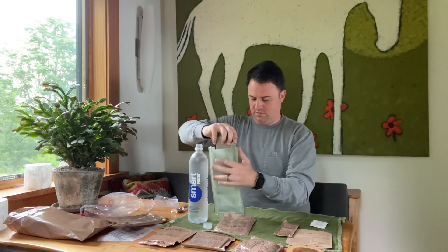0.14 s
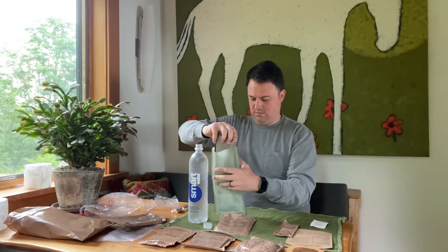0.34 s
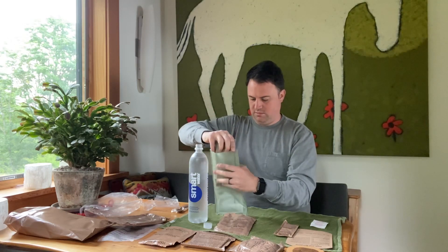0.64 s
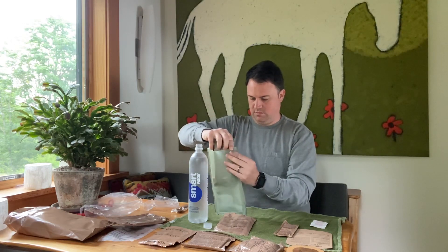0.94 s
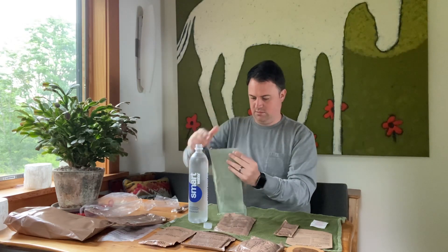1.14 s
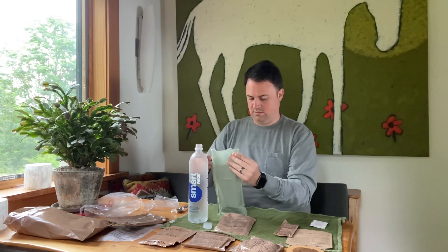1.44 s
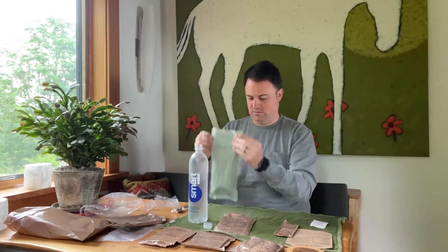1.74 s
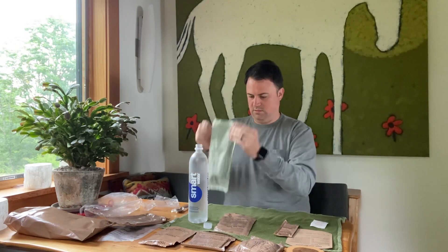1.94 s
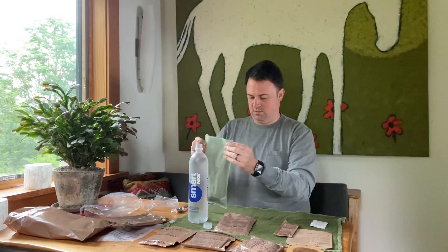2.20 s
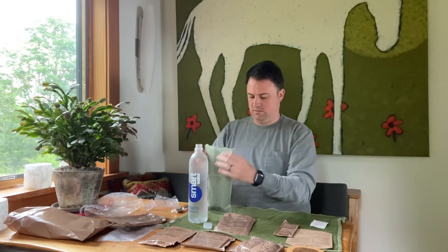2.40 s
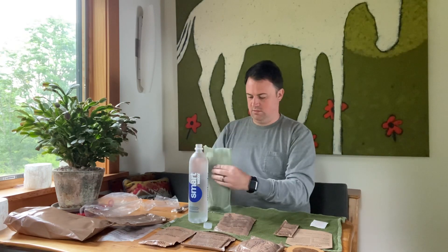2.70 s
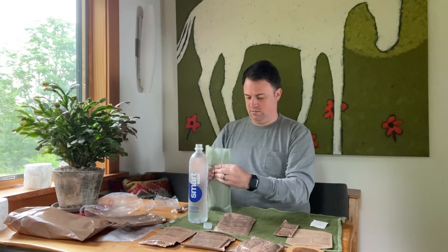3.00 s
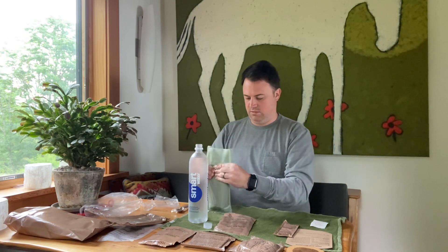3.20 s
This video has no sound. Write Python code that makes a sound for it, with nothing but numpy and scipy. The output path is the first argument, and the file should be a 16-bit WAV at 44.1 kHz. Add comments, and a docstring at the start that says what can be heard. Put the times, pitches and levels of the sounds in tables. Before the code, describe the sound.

A thin plastic sleeve crinkles and crackles sharply in bursts as hands work a pouch inside.

```python
"""At a table in a small, quiet room, a food pouch is worked down into a thin plastic heater sleeve. Creases
snap as sharp filtered clicks over a dense crinkle of random ticks that follows each push of the hands. The
pouch knocks, and the film squeaks and ticks, in short decaying tones; the pouch bumps softly, a low swing with
filtered noise, as the sleeve is lifted and set down. Two microphones hear snaps, crinkle and ringing tones
directly and by reflections made of decaying noise, over faint room tone."""
import sys
import numpy as np
from scipy import signal
from scipy.fft import rfft, irfft
from scipy.io import wavfile

SR = 44100
rng = np.random.default_rng(int(sys.argv[2]) if len(sys.argv) > 2 else 0)


def to_wav(s):
    """Save 16-bit WAV."""
    ch = np.atleast_2d(s).T  # columns
    pcm = np.round(np.clip(ch, -1, 1) * 32767)  # PCM
    wavfile.write(sys.argv[1], SR, pcm.astype(np.int16))


N = 147735
TAPS = 16384  # length of the room responses, samples
HZ = np.fft.rfftfreq(TAPS, 1 / SR)


def amp(db):
    """Decibels to gain."""
    return 10 ** (np.asarray(db) / 20)


def unit(x):
    """Scales to rms 1."""
    return x / np.sqrt(np.mean(x ** 2) + 1e-20)


def read(points, hz):
    """Reads a curve over frequency, straight between its points on a log-frequency axis."""
    f, value = np.transpose(points)
    return np.interp(np.log(hz + 1), np.log(f), value)


def add(mix, start_s, sound):
    """Adds a stereo sound to the mix at its start time."""
    part = mix[:, max(round(start_s * SR), 0):][:, :sound.shape[1]]
    part += sound[:, :part.shape[1]]


def causal(gain):
    """The sharpest impulse response with this spectrum: minimum phase, from the log gain."""
    log_gain = np.log(np.maximum(gain, gain.max() * 1e-5))
    both_sides = np.r_[log_gain, log_gain[-2:0:-1]]
    spectrum = np.exp(np.conj(signal.hilbert(both_sides)))
    return irfft(spectrum[:len(gain)])


def snaps():
    """A crease flips in one sharp click, rings for a few cycles and sets off smaller ones."""
    # Snapping creases. Each row: start in seconds, level in dB before snap_db, body and treble
    # in dB relative to the middle, ring in Hz.
    creases = [(0.0231, -31, -16, -8, 1960), (0.1368, -21, -23, -3.5, 1980), (0.159, -26, -14, -10, 1730),
               (0.208, -27.5, -16, -22, 1090), (0.2278, -24, -19, -2, 1030), (0.29, -24.5, -21, -6, 1430),
               (0.404, -21.5, -2, -2, 3580), (0.4079, -21, -9, -11, 1950), (0.4302, -23.5, -6, -0.5, 1740),
               (0.454, -21.5, -17, -8, 1790), (0.5555, -24.5, -6, -3, 2060),
               (0.5643, -18, -13.5, -15, 3040), (0.612, -24.5, -21, -32, 1760),
               (0.6345, -24, -13, -9, 1900), (0.6672, -21.5, -11, -20, 1840), (0.684, -16.5, -6, 9, 1690),
               (0.735, -27.5, -18, -26, 1730), (0.788, -27.5, -21, -2, 1510), (0.8046, -22, -5, -4, 1930),
               (0.8597, -22.5, -7, -3, 2000), (0.9939, -20, -3, 3, 1700), (1.009, -18.5, 2.5, 0, 1700),
               (1.036, -15.5, -4.5, -3, 1670), (1.0717, -21, -16, -17, 1970), (1.1078, -14, -7, -20, 1910),
               (1.152, -14.5, -8.5, 1.5, 1930), (1.2003, -19, -7.5, -10, 1550),
               (1.2447, -21.5, -6, -26, 1800), (1.285, -31.5, -10, -8, 1930), (1.3014, -17, -9, 1, 2220),
               (1.405, -28.5, -2, -14, 2120), (1.4444, -28.5, -3, -10, 1800), (1.5002, -30, -5, -22, 1350),
               (1.5645, -23, 0, -1, 1860), (1.585, -25.5, -1, -6, 1900), (1.6317, -25.5, -1, -10, 2100),
               (1.832, -45.5, 0, -16, 1830), (1.9095, -16, -5, -3, 1660), (1.9524, -14, -28, -4.5, 4640),
               (2.009, -14.5, -4.5, -9, 2700), (2.024, -21.5, 0, 3, 2260), (2.0792, -24.5, -1, -1, 2100),
               (2.1548, -32, -22, -18, 2100), (2.171, -32.5, -21, -13, 1570),
               (2.241, -28, -2.5, -1.5, 2020), (2.421, -20, 0, 1, 2310), (2.4416, -21, -23, -2, 3360),
               (2.48, -13, -0.5, 2.5, 1730), (2.524, -24, -2, -15, 2240), (2.591, -18, -5, -1.5, 3230),
               (2.6017, -20, -13, 12, 1760), (2.6684, -21.5, -3, -7.5, 2430), (2.844, -37.5, -6, -11, 1990),
               (2.8677, -18, -6, 3, 4440), (2.9615, -16, 5, 10, 5200), (3.033, -25.5, 8, 5, 1400),
               (3.0762, -19, -9, 0, 2120), (3.0905, -22, -8, -19, 2260), (3.1207, -19.5, -17, -10, 1180),
               (3.185, -26.5, -10, 11, 1670), (3.2458, -22.5, -17, -4, 1640)]
    snap_db, direct_db = 4.5, 3  # large facets beam their sound at the microphones
    ring_db, ring_width_oct = 5, .22
    after_db, after_s = -13, .002  # the smaller clicks and their decay time
    out = np.zeros((2, N))
    body, middle, treble = film_bands()
    t = np.arange(TAPS // 16) / SR
    for start_s, db, body_db, treble_db, ring_hz in creases:
        octaves = np.log2((HZ + 1) / ring_hz)
        ring = amp(ring_db * np.exp(-.5 * (octaves / ring_width_oct) ** 2))
        colour = amp(body_db) * body + middle + amp(treble_db) * treble
        click = causal(unit(colour * ring * facet()))
        # cubed noise: a few strong clicks among many weak ones
        smaller = unit(rng.standard_normal(len(t)) ** 3 * np.exp(-t / after_s))
        force = amp(after_db) * smaller / np.sqrt(len(t))
        force[0] += 1  # the crease itself
        sound = signal.fftconvolve(click[:TAPS // 8], force)
        heard = signal.fftconvolve(sound[None], room(direct_db), axes=1)
        add(out, start_s, amp(db + snap_db) * heard)
    return out


def crinkle(count=8):
    """Many facets tick at random and rub, as strongly as the hands work the sleeve."""
    # The hands at work, one curve per push or shake. Each row: time in seconds, crinkle level in dB
    # before crinkle_db, body and treble in dB relative to the crinkle.
    pushes = [
        [(0.0, -51, -13, -7.5), (0.054, -52.5, -5, -5.5), (0.126, -52.5, -17, -13), (0.142, -46.5, -5, -11),
         (0.238, -48.5, -10, -8), (0.28, -48.5, -4, -10), (0.302, -48.5, -19, -15), (0.38, -66.5, 8, 2)],
        [(0.38, -66, -20, 4), (0.406, -43.5, -4.5, 2), (0.532, -48.5, -4.5, -15), (0.56, -42.5, -12.5, 1.5),
         (0.662, -59.5, 10, -7), (0.682, -52, 2, 2), (0.726, -48.5, -0.5, -23), (0.805, -45, -5, -5.5),
         (0.92, -58.5, -16, -5)],
        [(0.92, -52.5, 0, -5), (0.992, -38.5, -9, -4.5), (1.11, -34.5, -7, -7.5), (1.2, -35.5, -8, -4),
         (1.314, -52.5, 1.5, -5), (1.376, -55.5, -4.5, -7), (1.452, -54.5, 1.5, -8), (1.49, -64.5, -2, -12)],
        [(1.552, -59, -7, -18), (1.566, -47, -17, 0), (1.6, -42, -6.5, -14), (1.64, -41.5, -2.5, -9),
         (1.738, -81, 4.5, -28), (1.88, -68, 5.5, -4)],
        [(1.88, -70, 12, 2), (1.908, -39, -12, -9.5), (1.982, -39, -6.5, 2), (2.0, -35, -5.5, 1),
         (2.19, -61.5, 0, -15), (2.246, -49, -8, -5), (2.318, -63.5, 5, -8)],
        [(2.37, -58, 3.5, -8.5), (2.418, -44.5, -1.5, -8), (2.496, -38.5, -22, -6), (2.56, -44.5, -1.5, -7),
         (2.6, -41.5, 0, 1.5), (2.696, -50, -11, -12), (2.78, -70, -5, 5), (2.792, -49, 3, -17),
         (2.82, -73, 3, -3)],
        [(2.82, -64, 4, -6), (2.874, -48, 0.5, 0), (2.944, -64, -10, 3), (2.964, -38, -9, -4),
         (3.018, -56.5, 8.5, 4.5), (3.088, -40.5, -1.5, 1.5), (3.16, -53, -2, -0.5), (3.31, -47.5, -8, -8.5),
         (3.35, -56.5, 2, -14.5)],
    ]
    crinkle_db, grains_per_s = -6.5, 420  # the rate is shared among the facets
    grain_spread_db, grain_limit = 3.5, 4.05  # the limit is in multiples of the spread
    rub_db = -14.5  # smooth sliding under the grains
    when, db, body_db, treble_db = np.vstack(pushes).T
    t = np.arange(N) / SR
    levels = [amp(np.interp(t, when, db + extra)) for extra in (body_db, 0, treble_db)]
    out, bands = np.zeros((2, N)), film_bands()
    for _ in range(count):
        size_db = grain_spread_db * np.minimum(rng.exponential(1, N), grain_limit)
        size = amp(size_db) * rng.choice([-1, 1], N)
        ticks = unit(size * (rng.random(N) < grains_per_s / count / SR))
        force = ticks + amp(rub_db) * rng.standard_normal(N)
        colour = facet()
        sound = np.zeros(N)
        for level, band in zip(levels, bands):
            response = causal(unit(band * colour))[:TAPS // 8]
            sound += signal.oaconvolve(force * level, response)[:N]
        out += signal.fftconvolve(sound[None], room(), axes=1)[:, :N]
    return amp(crinkle_db) * out / np.sqrt(count)


def pops():
    """A short ringing tone, a knock of the pouch, a squeak of rubbing film or a bright tick: the higher its
    pitch, the shorter the ring."""
    # Ringing tones: low knocks of the pouch, rub squeaks near 1.1 kHz, bright ticks higher up. # Each row:
    # start in seconds, level in dB before the doubling below, pitch in Hz.
    tones = [(.04, -36.5, 1120), (.137, -29, 2010), (.139, -43, 275), (0.174, -33.5, 1090),
             (.218, -45, 306), (.293, -33, 694), (.405, -32.5, 520), (.713, -37, 490), (1.108, -31, 394),
             (1.154, -33.5, 428), (1.201, -21, 1660), (1.244, -24.5, 3130), (1.443, -34, 1230),
             (2.481, -31.5, 540), (2.789, -57, 390), (2.866, -29, 1760), (3.247, -23.5, 3300)]
    decay_cycles, rise_cycles = 14, .5  # cycles to fall by 60 dB; cycles of the onset
    direct_db = 4.5  # large facets beam their sound at the microphones
    out, t = np.zeros((2, N)), np.arange(TAPS // 4) / SR
    for start_s, db, hz in tones:
        rise = 1 - np.exp(-hz * t / rise_cycles)
        swing = np.sin(2 * np.pi * hz * t) * rise * amp(-60 * hz * t / decay_cycles)
        heard = signal.fftconvolve(swing[None], room(direct_db), axes=1)
        # the right channel gets twice the rms size of the swing
        match = np.linalg.norm(swing) / np.linalg.norm(heard[1]) * 2
        add(out, start_s, amp(db) * heard * match)
    return out


def bumps():
    """The heavy pouch shifts and lands: a few slow swings, made uneven by its soft contents."""
    # Soft bumps of the pouch. Each row: start in seconds, level in dB.
    landings = [(1.608, -48), (2.006, -43), (2.139, -36), (2.189, -46)]
    bump_hz, swell_s, slosh_db = 82, 0.01, -6.5
    out, t = np.zeros((2, N)), np.arange(TAPS // 2) / SR
    swell = (t / swell_s * np.exp(1 - t / swell_s)) ** 2
    contents = signal.butter(2, [bump_hz / 2, 2 * bump_hz], "band", fs=SR)
    for start_s, db in landings:
        slosh = amp(slosh_db) * unit(signal.lfilter(*contents, rng.standard_normal(len(t))))
        thud = np.sin(2 * np.pi * bump_hz * t) * swell + slosh * np.sqrt(swell)
        add(out, start_s, amp(db) * np.array([thud, thud]))
    return out


def film_bands():
    """Body, middle and treble of the film's colour, each scaled to rms 1 over frequency."""
    # Colour of the plastic. Each row: frequency in Hz, relative level in dB per Hz.
    film = [(35, -77), (60, -12), (144, -8.5), (213, -12), (257, -3.5), (436, -5), (525, -2), (563, -6),
            (709, -0.5), (872, -5.5), (1100, -3), (1830, -2), (2000, 0), (2410, -5.5), (3250, -2.5),
            (4090, -10.5), (4810, -8.5), (5400, -15), (6490, -12), (8370, -17), (13300, -54.5),
            (14900, -33)]
    body_hz, treble_hz = 830, 4330  # borders of body, middle and treble
    low_hz = 126  # the light film radiates little below this
    low = 1 / (1 + (HZ / body_hz) ** 6)
    high = 1 - 1 / (1 + (HZ / treble_hz) ** 6)
    body = low * HZ ** 2 / (HZ ** 2 + low_hz ** 2)
    colour = amp(read(film, HZ))
    return [unit(weight * colour) for weight in (body, 1 - low - high, high)]


def facet(count=36):
    """Each facet of film has chance resonances of its own: gain by frequency."""
    ripple_db = 2.5
    points = np.c_[np.geomspace(150, SR / 3, count), rng.standard_normal(count)]
    return amp(ripple_db * read(points, HZ))


def room(direct_db=0):
    """Path from one spot on the sleeve to both microphones: direct sound, near reflections, ringing tail."""
    # Decay of the room. Each row: frequency in Hz, time to fall by 60 dB in seconds.
    decay = [(100, 0.63), (500, 0.25), (1500, 0.28), (4000, 0.3), (10000, 0.26)]
    # Left-right likeness of the reflections. Each row: frequency in Hz, likeness from 0 to 1.
    likeness = [(100, 1), (400, 0.49), (1000, 0.32), (2000, 0.093), (6000, 0.068), (14000, 0.06)]
    # Faint resonances of the surroundings. Each row: frequency in Hz, level in dB re reflections.
    resonances = [(318, -7.5), (370, -9.5), (440, -0.5), (523, 1), (699, -24), (1687, 1.5), (2041, 0.5)]
    resonance_width_hz = 20
    tail_db, early_db, early_s, gap_s = 0, 0.5, 0.012, 0.002  # gap: before the reflections build up
    spread_s = 0.001103  # bending waves in the film: 1 kHz arrives this late, the treble sooner
    scatter_db, scatter_s = -5.5, 0.00055  # a short reflection off the table follows the click
    left_db = -3.5  # direct sound on the left relative to the right

    t = np.arange(TAPS) / SR
    hz, when, z = signal.stft(rng.standard_normal((2, TAPS)), SR, nperseg=256)
    fading = z * amp(-60 * when / read(decay, hz)[:, None])
    tail = signal.istft(fading, SR, nperseg=256)[1][:, :TAPS]
    early = rng.standard_normal((2, TAPS)) * np.exp(-t / early_s)
    onset = 1 - np.exp(-(t / gap_s) ** 2)
    reflections = amp(tail_db) * unit(tail * onset) + amp(early_db) * unit(early * onset)
    wet = rfft(reflections) / np.sqrt(TAPS)
    wet *= 1 + sum(amp(db) / (1 + 2j * (HZ - f) / resonance_width_hz) for f, db in resonances)
    alike = np.clip(read(likeness, HZ), 0, 1)
    wet[0] = alike * wet[1] + np.sqrt(1 - alike ** 2) * wet[0]

    bounce = rfft(unit(rng.standard_normal(TAPS) * np.exp(-t / scatter_s))) / np.sqrt(TAPS)
    bending = np.exp(-4j * np.pi * spread_s * np.sqrt(1000 * HZ))
    scattered = (1 + amp(scatter_db) * bounce) / np.hypot(1, amp(scatter_db))
    direct = amp(direct_db) * bending * scattered
    return irfft(wet + amp([[left_db], [0]]) * direct)


def room_tone():
    """Faint steady air of the room: coloured noise, partly shared by the two channels."""
    # Colour of the air. Each row: frequency in Hz, relative level in dB per Hz.
    air = [(25, -9), (80, 9.5), (200, -2), (500, -47), (2000, -46), (8000, -30), (14000, -53)]
    air_db = -72
    noise = rng.standard_normal((2, N)) + rng.standard_normal(N)
    colour = amp(read(air, np.fft.rfftfreq(N, 1 / SR)))
    return amp(air_db) * unit(irfft(rfft(noise) * colour, N))


def scene():
    """Sleeve and pouch in the room."""
    return snaps() + crinkle() + pops() + bumps() + room_tone()


def record(dry):
    """The two microphones differ in level and phase; then the band limit."""
    # Level balance of the pair. Each row: frequency in Hz, left minus right in dB.
    lean = [(60, -1.5), (150, -1.5), (370, -2.5), (930, 0.5), (2320, -5.5), (5790, -8), (14400, -0.5)]
    # Phase of the pair. Each row: frequency in Hz, lead of the left microphone in radians.
    lead = [(30, 1), (150, -1.34), (400, -1.06), (730, -3), (1000, -4.5), (1400, -5.5), (2000, -7.5),
            (2600, -4), (3100, -4.5), (3800, -9), (4900, -1), (6400, -6), (7300, -3.5), (10000, -5.5)]
    edge_hz = 14000  # upper band limit
    hz = np.fft.rfftfreq(N, 1 / SR)
    lean_db = read(lean, hz)
    left = amp(lean_db / 2) * np.exp(1j * read(lead, hz))
    right = amp(-lean_db / 2)
    heard = irfft(rfft(dry) * np.array([left, right]), N)
    lowpass = signal.firwin(255, edge_hz, window=("kaiser", 9), fs=SR)
    return signal.oaconvolve(heard, lowpass[None], "same")


dry = scene()
out = record(dry)
to_wav(out)
```